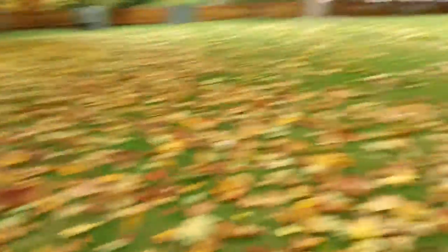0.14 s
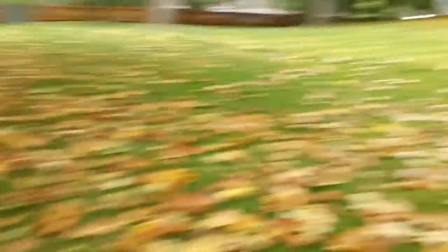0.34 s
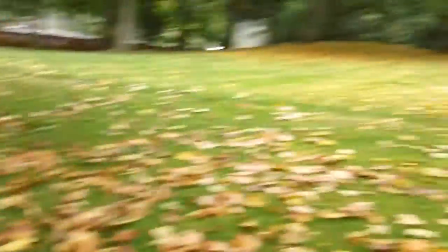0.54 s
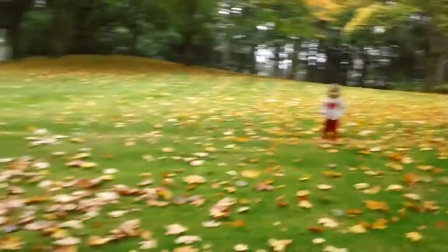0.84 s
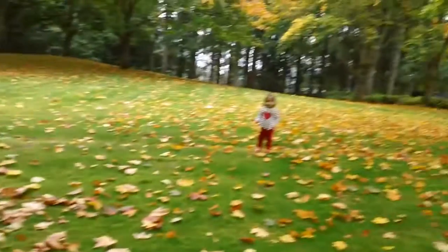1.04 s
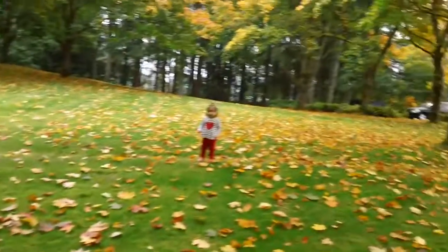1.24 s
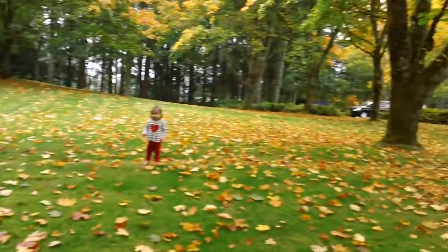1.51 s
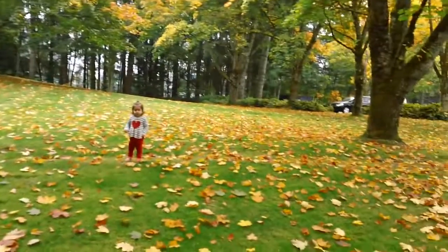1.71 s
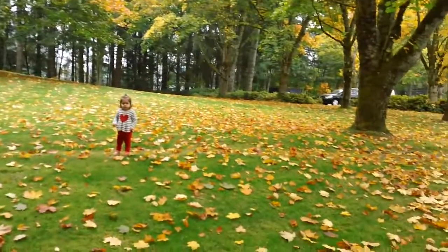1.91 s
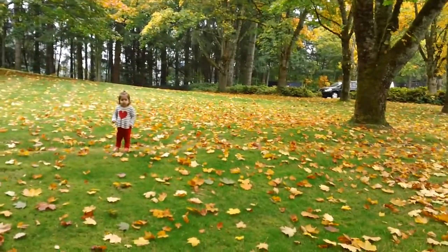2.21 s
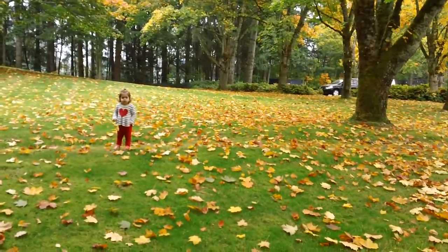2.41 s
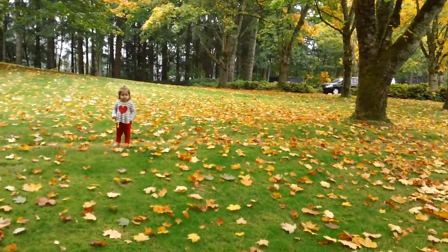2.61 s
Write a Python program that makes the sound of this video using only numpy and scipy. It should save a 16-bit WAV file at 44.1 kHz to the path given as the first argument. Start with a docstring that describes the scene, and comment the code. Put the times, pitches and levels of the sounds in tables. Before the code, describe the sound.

Crisp leaf crunching underfoot on a park lawn quickly fades, leaving faint far traffic and engine drone

```python
"""Dry leaves crush and snap under feet that turn and shuffle on a park lawn, then stand almost still.
Dense ringing cracks over smooth noise make the crush; short band-limited bursts make the snaps.
Decaying low sines give soft thuds, and a faint band of noise rustles near the end.
Behind them a distant engine hums in wavering sines over far road noise, shaped from steady noise.
A small pair of close microphones adds its own hiss and has a dead spot high in the treble."""
import sys
import numpy as np
from scipy import signal
from scipy.fft import rfft, irfft
from scipy.io import wavfile

SR = 44100
rng = np.random.default_rng(int(sys.argv[2]) if len(sys.argv) > 2 else 0)


def ratio(d):
    """dB to gain"""
    e = np.asarray(d, float) / 20
    return 10 ** e


def put_to_file(sound):
    """Save the sound as 16-bit audio at rate SR, in the file named by the first command-line argument."""
    columns = np.atleast_2d(sound).T  # one column per channel
    safe = np.clip(columns, -1, 1)
    whole_steps = np.round(safe * 32767)
    wavfile.write(sys.argv[1], SR, whole_steps.astype(np.int16))


N = 121275  # samples, 2.75 s

# Pressure of the feet on the leaves: time_s, level_db (before the make-up gain),
# low_lift_db (crunch band), crisp_lift_db (top band)
FOOT_PRESSURE = [(0, -33, -0.5, 1), (.05, -35.5, -3, -3.5), (.066, -35, -8, 0.5), (.077, -46.5, -2, 16),
                 (.086, -48.5, 1, -3), (.26, -50.5, 4, 0), (.376, -52.5, 2.5, -3), (.398, -48.5, 8.5, 3),
                 (.424, -41.5, 1, 4.5), (.434, -39.5, -7, -0.5), (.444, -43, 4, 0), (.474, -55.5, -3, 6.5),
                 (.488, -42.5, -3, 5), (.506, -46, 2, -4), (.532, -35.5, -3, -5), (.57, -39.5, -4, -6),
                 (.6, -40, 2.5, -1), (.63, -46.5, -7, -0.5), (.68, -51.5, -6, -3), (.76, -46.5, 3.5, -0.5),
                 (.87, -45.5, -8.5, 4.5), (.93, -41.5, -5, 1.5), (1.0, -44, -2, 3), (1.034, -41.5, -3, 1),
                 (1.046, -38.5, -1, 6), (1.09, -43.5, 1, -2), (1.12, -50.5, -1, -1), (1.19, -59.5, -3, -5),
                 (1.3, -62, 0, -2), (1.45, -72, -6, 8), (1.58, -62.5, 0, 8.5), (1.75, -68, -6, 6),
                 (1.95, -65.5, -4, 11.5), (2.15, -74, -6, 3), (2.58, -77, -2, 2), (2.65, -60.5, -5, 0),
                 (2.75, -59.5, 0, -10)]
# Colour of crackle and swish: frequency_hz, density_db (relative, per Hz)
LEAF_COLOUR = [(250, -18), (450, -13.5), (750, -0.5), (1300, -3), (2600, -5), (5000, -10.5), (7000, -13),
               (9500, -10.5), (15000, -15), (22000, -11)]
# Single leaves snap: start_s, peak_db, low_hz, high_hz
LEAF_SNAPS = [(0.027, -19, 1800, 4500), (0.0624, -19.5, 5050, 9100), (0.0668, -22, 5500, 9900),
              (.0764, -24, 4050, 12100), (0.1486, -32, 2500, 5000), (.1754, -32, 8000, 15000),
              (.1915, -30, 2350, 2880), (.2094, -30.5, 2000, 6440), (0.244, -30, 2020, 15000),
              (0.2617, -31, 2000, 6000), (0.2653, -32, 1920, 2070), (0.2675, -30, 3000, 12000),
              (0.3542, -29.5, 970, 1540), (0.3818, -20.5, 1310, 3630), (.404, -26, 690, 1600),
              (.4335, -21, 1520, 3430), (0.429, -21.5, 4000, 15000), (.461, -32, 12800, 15000),
              (0.4855, -34, 3000, 11000), (.5152, -29, 455, 900), (.595, -29.5, 500, 1010),
              (.556, -27.5, 550, 950), (0.5275, -26, 2500, 7040), (0.5562, -29.5, 1450, 1870),
              (0.5882, -24, 1500, 5000), (.7452, -27.5, 7100, 12000), (0.9331, -20.5, 1300, 5500),
              (.9335, -26.5, 398, 1090), (1.012, -29, 704, 1420), (1.05, -33, 407, 800),
              (1.0066, -39, 9000, 15000), (1.0434, -23, 2000, 12000), (1.049, -20.5, 1490, 4050),
              (1.0485, -23.5, 7300, 11600), (1.061, -29, 8200, 15100), (1.2107, -36.5, 7000, 12000),
              (1.2144, -32, 7000, 15000), (2.6287, -36, 7060, 15000)]
# Weight comes down on a foot: start_s, level_db (where the decay starts), pitch_hz
FOOT_THUDS = [(0.431, -35, 56.4), (0.502, -39.5, 153.4)]
# Engine orders: pitch_ratio (multiple of the hum pitch), level_db (rms), waver_db
ENGINE_ORDERS = [(1.0, -44, .8), (2.0, -58, 2.5), (3.0, -67, 1.5)]
# A lower engine throb comes and goes: time_s, level_db (rms)
THROB_LEVEL = [(0, -49), (.12, -45.5), (.4, -49.5), (.7, -57), (.9, -58), (1.2, -47.5), (1.5, -56),
               (1.7, -58), (2.75, -62)]
# Colour of the far road: frequency_hz, density_db (relative, per Hz)
ROAD_COLOUR = [(15, -46), (25, -25), (54, -10.5), (85, -15), (140, -10), (230, -17), (300, -20.5),
               (450, -19.5), (600, -19), (780, -13), (1300, -16), (2100, -25), (4000, -34), (8000, -41),
               (15000, -42), (22000, -46)]
# Road loudness: time_s, level_db (rms, before the road lift)
ROAD_FADER = [(0.0, -44), (1.0, -43), (1.13, -44), (2.75, -44)]
# Colour of each microphone's own hiss: frequency_hz, density_db (relative, per Hz)
HISS_COLOUR = [(50, -50), (150, -21), (380, -3), (800, -16.5), (2000, -16), (6000, -9.5), (11000, -11.5),
               (15000, -14)]

# Crackle: cracks a second at the reference level; spread of crack size
CRACKS_PER_S, REFERENCE_DB, CRACK_SPREAD_DB = 7000, -45.5, 3.3
RATE_FOLLOWS = 0.27  # dB of crack rate for each dB of pressure
CRACK_CYCLES = 5.0  # cycles for each of two resonators in a row to fall 60 dB
CLUMP_DB, CLUMP_RATE_HZ = 2, 67  # loudness swells shared by neighbouring cracks
CRACKLE_DB, SWISH_DB, CRUSH_MAKEUP_DB = -2, -4, 4.5
CRUNCH_BELOW_HZ, CRISP_ABOVE_HZ = 3500, 7400
SNAP_T60_S, SNAP_RISE_S = 0.0056, 0.00037
SNAP_DULL = 0.89  # share of the last smoothed sample carried into the next
THUD_T60_S = 0.33
LATE_S, LATE_RISE_S, LATE_DB, LATE_WAVER_DB = 2.547, 0.11, -58.5, 2.1
LATE_LOW_HZ, LATE_HIGH_HZ = 3100, 4150
HUM_HZ, HUM_WAVER_HZ = 111.8, 0.37
THROB_HZ, THROB_WAVER_HZ, THROB_WAVER_DB = 75.8, 1.7, 2.0
ROAD_LIFT_DB, ROAD_PATCHY_DB = 2.5, 0.92
HISS_DB = -62.5
DEAD_HZ, DEAD_Q, DEAD_CORE_Q = 12480, 3.7, 25
TOP_DB = -0.5  # trim above the dead spot
TOP_CUT_HZ = 15420  # the steep cut is 30 dB down here


def rms_one(x):
    """Scale to rms 1."""
    return x / np.sqrt(np.mean(x ** 2) + 1e-20)


def in_time(rows):
    """Draw a table's columns as automation curves, one value a sample."""
    time_s, *columns = np.transpose(rows)
    return [np.interp(np.arange(N) / SR, time_s, column) for column in columns]


def at_hz(points, hz):
    """Read a spectrum on a log frequency axis."""
    point_hz, point_db = np.transpose(points)
    return np.interp(np.log(hz), np.log(point_hz), point_db)


def drift(rate_hz):
    """Random wander of spread 1: noise smoothed by two equal poles at this rate."""
    pole = np.exp(-2 * np.pi * rate_hz * 20 / SR)  # runs at one value per 20 samples
    noise = rng.standard_normal(N // 20 + 4002)
    slow = signal.lfilter([1], [1, -2 * pole, pole ** 2], noise)[4000:]  # drop the run-in
    return np.interp(np.arange(N) / 20, np.arange(len(slow)), rms_one(slow - slow.mean()))


def ring(x, hz, t60_s):
    """A two-pole resonator: a unit click rings as a decaying sine."""
    radius = ratio(-60 / (t60_s * SR))
    angle = 2 * np.pi * min(hz, SR / 2.2) / SR
    return signal.lfilter([0, np.sin(angle)], [1, -2 * radius * np.cos(angle), radius ** 2], x + 1e-18)


def coloured(spectrum, channels=1):
    """Steady noise with the given spectrum below 16 kHz, rms 1."""
    hz = np.maximum(np.fft.rfftfreq(N, 1 / SR), 1)
    gain = ratio(at_hz(spectrum, hz)) * (hz < 16000)
    white = rng.standard_normal((channels, N))
    return rms_one(irfft(rfft(white) * gain, N))


def filtered(x, order, hz, kind):
    """Butterworth low-pass, high-pass or band-pass filter."""
    return signal.sosfilt(signal.butter(order, hz, kind, fs=SR, output="sos"), x)


def crackle(level_db):
    """Random clicks, swelling in clumps, are dealt among resonators that ring a few cycles."""
    size = ratio(CRACK_SPREAD_DB * np.minimum(rng.exponential(1, N), 4)) * rng.choice([-1, 1], N)
    rate = CRACKS_PER_S * ratio(RATE_FOLLOWS * (level_db - REFERENCE_DB))
    happens = rng.random(N) < rate / SR
    # dividing by sqrt(rate) keeps denser cracking from getting louder
    clicks = happens * size / np.sqrt(rate) * ratio(CLUMP_DB * drift(CLUMP_RATE_HZ))
    dealt = rng.integers(0, 24, N)
    out = 0
    for k, hz in enumerate(np.geomspace(420, 15500, 24)):
        t60_s = CRACK_CYCLES / hz
        band = ring(ring(clicks * (dealt == k), hz, t60_s), hz, t60_s)
        out = out + ratio(at_hz(LEAF_COLOUR, hz)) * np.sqrt(hz) * rms_one(band)  # sqrt: bandwidth
    return rms_one(out)


def leaves():
    """Crackle over the swish of sliding leaves; foot pressure rides the level, crunch and crispness."""
    level_db, low_lift_db, crisp_lift_db = in_time(FOOT_PRESSURE)
    swish = coloured(LEAF_COLOUR)[0]
    crush = ratio(CRACKLE_DB) * crackle(level_db) + ratio(SWISH_DB) * swish
    crunch = filtered(crush, 2, CRUNCH_BELOW_HZ, "low")
    crisp = filtered(crush, 2, CRISP_ABOVE_HZ, "high")
    tilted = crush + (ratio(low_lift_db) - 1) * crunch + (ratio(crisp_lift_db) - 1) * crisp
    return ratio(level_db + CRUSH_MAKEUP_DB) * tilted


def snaps():
    """Each snap is a short dulled noise burst in the band of its leaf; a narrow band rings on."""
    t = np.arange(2000) / SR
    out = np.zeros(N + len(t))
    for start_s, peak_db, low_hz, high_hz in LEAF_SNAPS:
        envelope = ratio(-60 * t / SNAP_T60_S) * np.minimum(t / SNAP_RISE_S, 1)
        burst = rng.standard_normal(len(t)) * envelope
        dulled = signal.lfilter([1], [1, -SNAP_DULL], burst)
        snap = filtered(dulled, 3, [low_hz, high_hz], "band")
        start = int(start_s * SR)
        out[start:start + len(t)] += ratio(peak_db) * snap / np.abs(snap).max()
    return out[:N]


def thuds():
    """Soft low pushes through the turf: sines that fade in over one cycle while they decay."""
    t, out = np.arange(N) / SR, 0
    for start_s, level_db, pitch_hz in FOOT_THUDS:
        age = np.maximum(t - start_s, 0)
        envelope = ratio(level_db - 60 * age / THUD_T60_S) * np.minimum(age * pitch_hz, 1)
        out = out + envelope * np.sin(2 * np.pi * pitch_hz * age)
    return out


def late_rustle():
    """A faint narrow band of noise swells near the end, its level wavering."""
    noise = filtered(rng.standard_normal(N), 2, [LATE_LOW_HZ, LATE_HIGH_HZ], "band")
    swell = np.clip((np.arange(N) / SR - LATE_S) / LATE_RISE_S, 0, 1)
    return ratio(LATE_DB + LATE_WAVER_DB * drift(18.0)) * swell * rms_one(noise)


def engine():
    """A firing tone and its overtones share one slightly wandering pitch, with a lower throb."""
    phase = 2 * np.pi * np.cumsum(HUM_HZ + HUM_WAVER_HZ * drift(2.27)) / SR
    hum = 0
    for pitch_ratio, level_db, waver_db in ENGINE_ORDERS:
        gain = np.sqrt(2) * ratio(level_db + waver_db * drift(8.8))  # sqrt(2): rms to peak
        hum = hum + gain * np.sin(round(pitch_ratio) * phase + rng.uniform(0, 2 * np.pi))
    throb_phase = 2 * np.pi * np.cumsum(THROB_HZ + THROB_WAVER_HZ * drift(3.2)) / SR
    throb = np.sin(throb_phase + rng.uniform(0, 2 * np.pi))
    throb_db = in_time(THROB_LEVEL)[0] + THROB_WAVER_DB * drift(7.2)
    return hum + np.sqrt(2) * ratio(throb_db) * throb


def road():
    """Far tyre roar and rumble: coloured noise with a slowly patchy level."""
    level_db = in_time(ROAD_FADER)[0] + ROAD_LIFT_DB + ROAD_PATCHY_DB * drift(1.0)
    return ratio(level_db) * coloured(ROAD_COLOUR)[0]


def scene():
    """All sources reach both microphones alike."""
    mix = leaves() + snaps() + thuds() + late_rustle() + engine() + road()
    return np.tile(mix, (2, 1))


def microphones(sound):
    """Separate hiss in each channel, a dead spot at the port's cancellation, a trimmed top."""
    x = sound + ratio(HISS_DB) * coloured(HISS_COLOUR, channels=2)
    for q in (DEAD_Q, DEAD_CORE_Q):  # a wide dip with a narrow core
        x = signal.lfilter(*signal.iirnotch(DEAD_HZ, q, SR), x)
    return x + (ratio(TOP_DB) - 1) * filtered(x, 2, DEAD_HZ, "high")


def top_cut(x):
    """Nothing passes above the cut-off."""
    return signal.sosfilt(signal.butter(12, 15710, fs=SR, output="sos"), x)


def record(dry):
    """The microphones colour the scene, then a steep filter cuts the extreme top."""
    steep_cut = signal.cheby2(18, 30, TOP_CUT_HZ, fs=SR, output="sos")
    finished = signal.sosfilt(steep_cut, microphones(dry))
    return top_cut(finished)


dry = scene()
out = record(dry)
put_to_file(out)
```